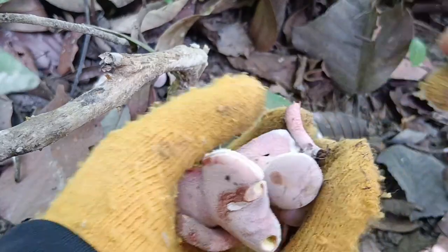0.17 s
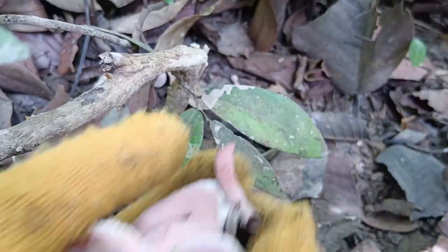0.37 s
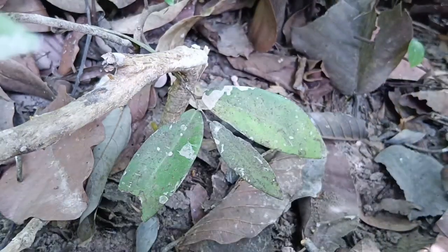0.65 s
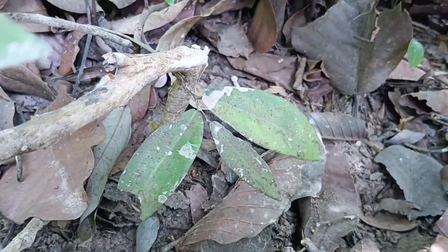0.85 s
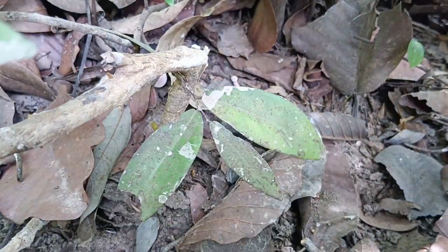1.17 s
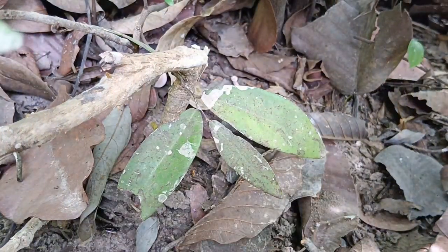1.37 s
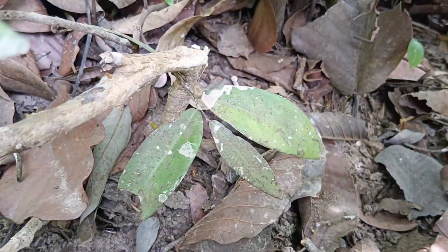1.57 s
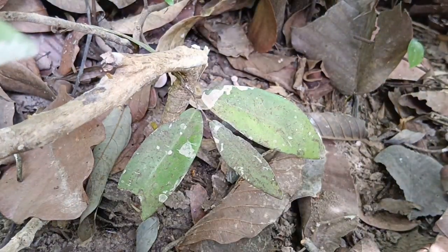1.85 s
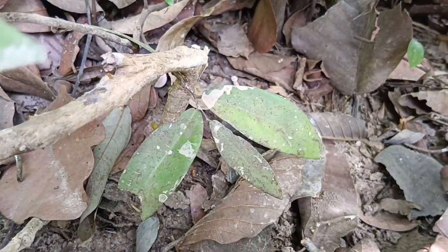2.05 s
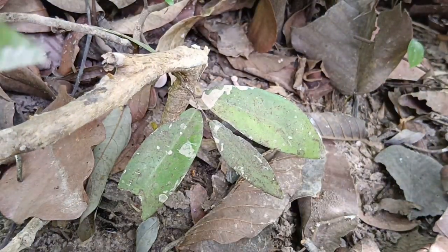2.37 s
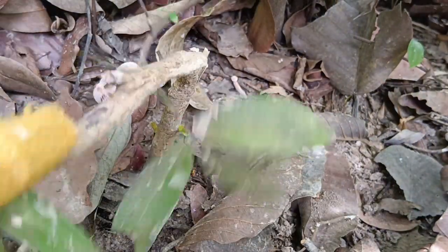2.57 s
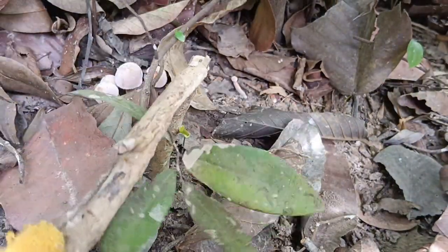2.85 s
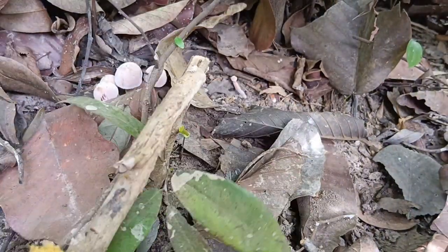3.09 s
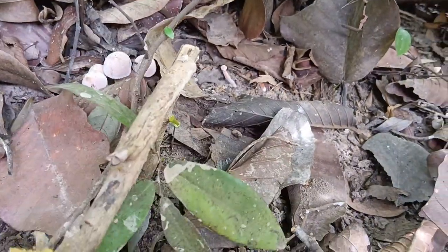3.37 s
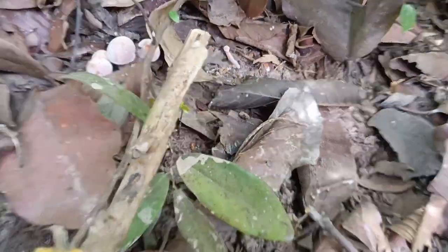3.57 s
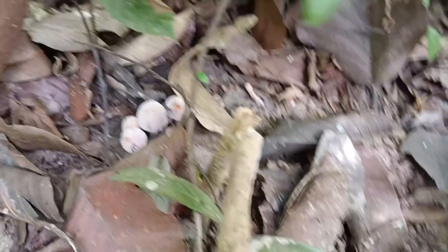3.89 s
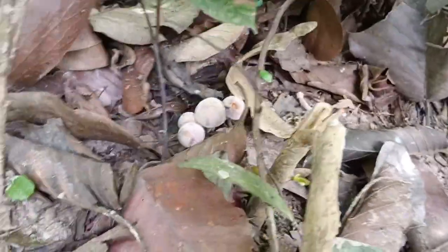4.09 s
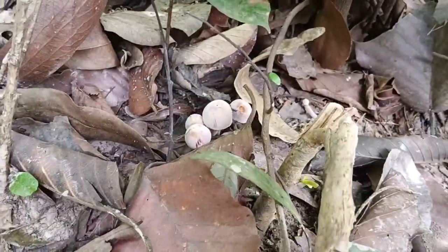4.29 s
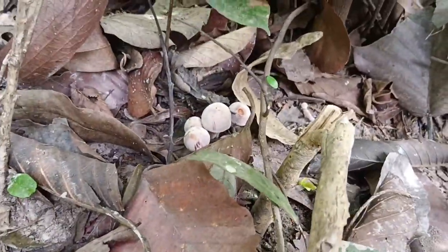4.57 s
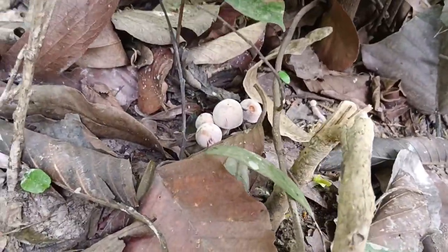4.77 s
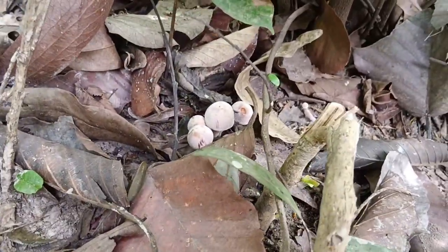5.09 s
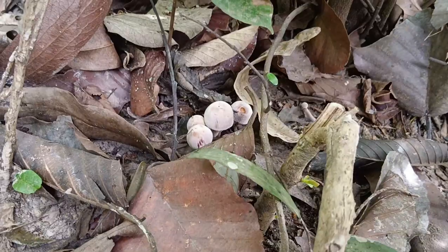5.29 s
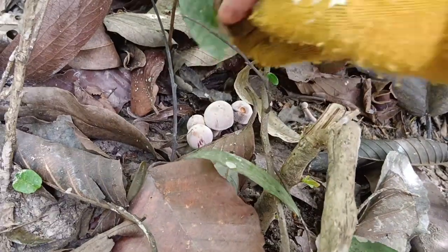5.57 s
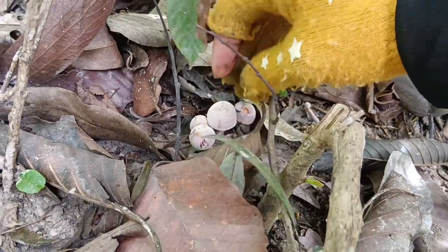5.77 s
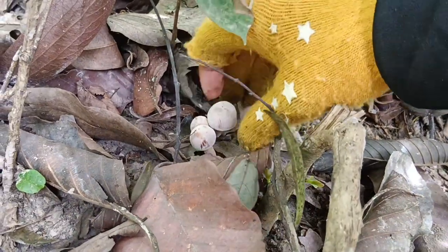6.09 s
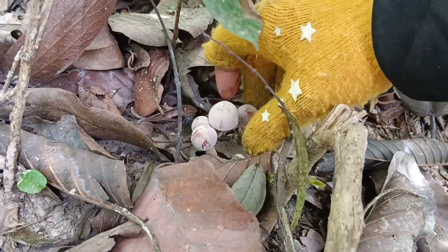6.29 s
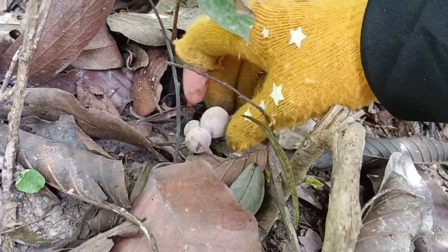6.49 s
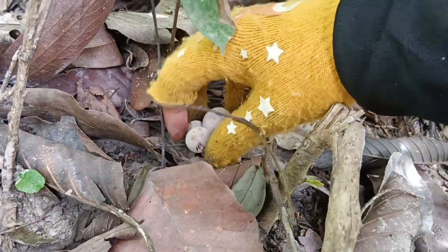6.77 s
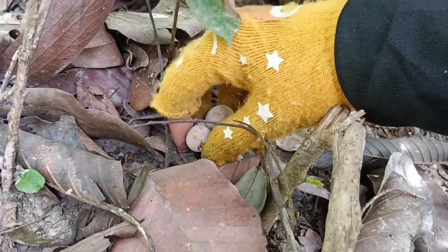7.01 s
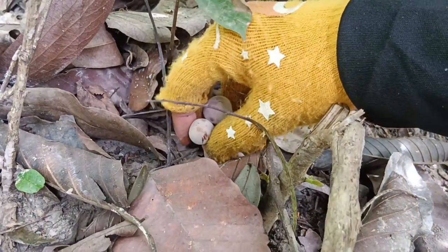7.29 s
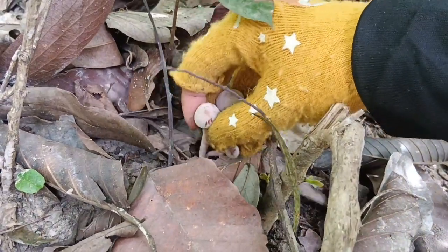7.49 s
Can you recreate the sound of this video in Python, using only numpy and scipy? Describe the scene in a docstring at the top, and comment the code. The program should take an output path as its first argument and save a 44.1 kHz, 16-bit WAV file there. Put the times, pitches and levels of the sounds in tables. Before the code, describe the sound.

Close stereo microphone on a forest floor. Faint crisp leaf rustles and a few light snaps come first, then near silence. A sudden loud crunch of leaves breaks in with a quick, dry wooden clatter as a branch is shoved aside. More crunching and a low bump on the microphone follow, then scattered twig snaps and soft rustling that fade to tiny ticks, over a faint steady hiss.

```python
"""A forest floor: gloved hands work through dry leaf litter, close to a hand-held stereo microphone.
Leaves rustle as thousands of tiny noise bursts, each coloured by a ringing blade; stiff blades and twigs
snap as larger bursts, and a dead branch is shoved aside with a woody clatter of decaying modes.
The hand holding the microphone bumps and rubs its housing: swelling low tones and rumbling noise.
Behind lies a faint, steady background of coloured noise with a hiss band in the treble."""
import sys
import numpy as np
from scipy import signal
from scipy.fft import rfft, irfft, next_fast_len
from scipy.io import wavfile
from scipy.ndimage import uniform_filter1d

SR = 44100
rng = np.random.default_rng(int(sys.argv[2]) if len(sys.argv) > 2 else 0)


def wrap_up_sound(samples):
    """Save the sound to the file named by the first command line argument, as 16-bit audio."""
    columns = np.atleast_2d(samples).T
    # keep every value between -1 and 1, then stretch to whole-number steps
    tamed = np.clip(columns, -1, 1)
    steps = np.round(tamed * 32767).astype(np.int16)
    wavfile.write(sys.argv[1], SR, steps)


N = 336924  # samples
TIME = np.arange(N) / SR
HZ = np.maximum(np.fft.rfftfreq(next_fast_len(N, True), 1 / SR), 1)
SNAP_SIZE = 2048  # samples in one fracture
SNAP_HZ = np.maximum(np.fft.rfftfreq(SNAP_SIZE, 1 / SR), 1)

# relative spectrum of breaking dry leaf: frequency_hz, density_db (per Hz)
LEAF_SPECTRUM = [(150, -39), (300, -19), (480, -15.5), (700, -10), (1100, -7.5), (1500, -2.5), (2600, 2),
                 (4300, -4.5), (5400, 0), (6500, -7.5), (8000, -10), (10500, -5), (12300, -7.5),
                 (15500, -13.5)]

# Everywhere below, a positive left_right_db means louder on the left.


def from_db(db):
    """Decibels to amplitude gain."""
    return 10 ** (np.asarray(db) / 20)


def rms_one(x):
    """Scale to rms 1."""
    return x / np.sqrt(np.mean(x ** 2) + 1e-20)


def in_time(rows):
    """Interpolate the columns of a curve, whose first column is time, at every sample."""
    s, *columns = np.transpose(rows)
    return [np.interp(TIME, s, column) for column in columns]


def at_hz(points, hz):
    """Read a spectrum on a log-frequency axis."""
    point_hz, db = np.transpose(points)
    return np.interp(np.log(hz), np.log(point_hz), db)


def panned(pan_db):
    """Left and right gains of constant power."""
    gains = from_db(np.array([[.5], [-.5]]) * pan_db)
    return gains / np.sqrt(np.mean(gains ** 2, axis=0))


def spectrum_of(x):
    """Spectrum of a whole track on the HZ grid."""
    return rfft(x, next_fast_len(N, True))


def track_of(spectrum):
    """Back from the HZ grid to a track."""
    return irfft(spectrum, next_fast_len(N, True))[..., :N]


def add(out, s, sound):
    """Mix a short stereo sound in at time s."""
    i = max(int(s * SR), 0)
    out[:, i:i + sound.shape[1]] += sound[:, :N - i]


def wander(per_s, count=4000):
    """A random course through per_s fresh values a second, joined by straight lines."""
    return np.interp(TIME * per_s, np.arange(count), rng.standard_normal(count))


def noise(points, alike_hz):
    """Coloured stereo noise of rms 1; the ports share half its power at alike_hz and more below."""
    shared = spectrum_of(rng.standard_normal(N))
    own = spectrum_of(rng.standard_normal((2, N)))
    alike = 1 / (1 + (HZ / alike_hz) ** 2)
    mixed = np.sqrt(alike) * shared + np.sqrt(1 - alike) * own
    return rms_one(track_of(mixed * from_db(at_hz(points, HZ))))


def gestures(rows, resting, attack_db_per_s, slope_db, release_db_per_s):
    """Attack, sloping hold and release per row over a resting state: level, then power-weighted columns."""
    t = TIME[::40]
    s, length_s, db, *columns = np.transpose(rows)[:, :, None]
    # a row's level is reached halfway through its hold
    hold_db = db + slope_db * (np.clip((t - s) / length_s, 0, 1) - .5)
    attack_db = attack_db_per_s * np.maximum(s - t, 0)
    release_db = release_db_per_s * np.maximum(t - s - length_s, 0)
    power = from_db(hold_db - attack_db - release_db) ** 2
    rest = from_db(resting[0]) ** 2
    total = power.sum(axis=0) + rest
    blends = [((power * column).sum(axis=0) + rest * value) / total
              for column, value in zip(columns, resting[1:])]
    return in_time(np.transpose([t, 10 * np.log10(total), *blends]))


def stirring():
    """Level, body, crispness and direction of the litter as the glove's strokes pass through it."""
    # strokes of the glove: start_s, length_s, level_db (relative), body_db, crispness_db, left_right_db
    strokes = [(0, 0.073, -59, -5, 15, 1), (.08, 0.078, -51, 3.5, 6.5, -2.5),
               (.19, 0.17, -49, 3.5, 7.5, -9), (.37, 0.096, -53.5, -7, 0, -9),
               (.46, 0.057, -49, 12.5, 1.5, -8), (.59, 0.18, -51, -6.5, -1.5, 1),
               (.84, 0.058, -53.5, -6, 2, -0.5), (.96, 0.099, -51, 0, 3.5, 0.5),
               (1.11, .055, -47.5, -11, 2, 3), (1.21, 0.048, -50.5, -1, 0.5, 1),
               (1.33, .18, -56, -4, 4, 1.5), (1.70, 0.024, -53.5, -3, -3, 9),
               (2.315, .06, -39, 11.5, 0, -9), (2.42, 0.065, -37, 13, -2, -4.5),
               (2.475, 0.043, -30.5, 8, -3, -4.5), (2.57, 0.26, -31.5, 9, -3.5, 0),
               (2.855, 0.033, -27, 7.5, -2.5, 2), (2.92, 0.075, -39, -2, -4.5, 1.5),
               (3.07, 0.084, -45, -4.5, -3.5, -7.5), (3.295, 0.058, -45.5, -20, -9, -0.5),
               (3.375, 0.12, -35, 2, -2.5, -1.5), (3.51, 0.086, -37, -11, 0, -1),
               (3.60, 0.17, -32, 1, -1, -0.5), (3.835, 0.11, -30.5, 2, -1.5, 0.5),
               (3.97, 0.031, -33, 1.5, -3, .5), (4.04, 0.049, -39.5, 5, -1.5, 2),
               (4.13, 0.083, -37.5, 6, -3.5, 0), (4.235, 0.013, -34.5, 9.5, -2, 0),
               (4.355, 0.016, -33.5, 6, -3.5, 0), (4.42, 0.0068, -42.5, 13.5, -5, -5),
               (4.545, 0.039, -41.5, -1, -3, 0.5), (4.69, 0.047, -41.5, 2, -2, -0.5),
               (4.88, .045, -52.5, -2, 2, -3), (4.945, 0.039, -41, -10, -3, 2.5),
               (5.035, 0.12, -43, 5.5, -0.5, 2), (5.18, 0.069, -48, 0, 0, 2), (5.305, .12, -40, 5, 3, 1),
               (5.45, 0.075, -42, 2, 3.5, 2), (5.60, 0.079, -39.5, 0.5, 1, 2),
               (5.71, 0.0079, -40, 8, -0.5, -3), (5.80, 0.092, -45, -14, -4.5, -3),
               (5.89, 0.17, -44, 4, 0.5, -1), (6.10, 0.023, -50.5, -21, -3.5, 3),
               (6.18, 0.035, -56.5, -14, 2, 0), (6.24, 0.041, -53.5, 2.5, 10, 1.5),
               (6.44, 0.027, -43, -4, -0.5, -6), (6.53, 0.087, -46.5, -10, 2.5, -5),
               (6.63, 0.053, -55, -11, 6, -9), (6.735, 0.025, -44.5, -2.5, 5.5, -7),
               (6.88, 0.12, -60.5, 2, 7, -4.5), (7.063, 0.011, -51, 2, 5, -5),
               (7.31, 0.035, -60.5, 4, 18.5, -6.5), (7.425, 0.059, -40.5, 5.5, 2, -3.5),
               (7.51, 0.072, -43, 6, -6, -5)]
    # leaves under a resting hand: level_db (relative), body_db, crispness_db, left_right_db
    resting_litter = (-70, 2, -0.5, 0.5)
    # a stroke bites in quickly, eases by 1 dB as it goes, and the leaves settle after it
    return gestures(strokes, resting_litter, attack_db_per_s=418.5, slope_db=-1, release_db_per_s=265)


def tone_db(hz, body_db, crisp_db, body_hz=(750, 1500), crisp_hz=(3200, 8000)):
    """Thick, pressed litter adds body; thin dry edges add crispness."""
    body = body_db * np.interp(np.log(hz), np.log(body_hz), [1, 0])
    crispness = crisp_db * np.interp(np.log(hz), np.log(crisp_hz), [0, 1])
    return body + crispness


def rustle(stir, count=26, patchy_db=3.0, shifts_per_s=30, gain_db=1.5, clump_db=2.0, clumps_per_s=170):
    """Crackle follows the stirring in clumps; its colour shifts as other leaves come under the glove."""
    # slow course of the level above about 10 kHz: time_s, treble_db
    top_treble = [(0, 4.5), (1.6, 3), (2.4, 4), (5.9, -1), (6.3, -5.5), (7.3, -9.5), (7.45, 1.5),
                  (7.64, -3)]
    level_db, body_db, crisp_db, pan_db = stir
    top_treble_db, = in_time(top_treble)
    grains = spectrum_of(crackle(level_db) + flicks())
    level_db = level_db + gain_db + clump_db * wander(clumps_per_s)
    centres = np.geomspace(300, 14000, count)
    out = 0
    for hz, pick in zip(centres, np.eye(count)):
        # overlapping triangular bands
        band = track_of(grains * np.interp(np.log(HZ), np.log(centres), pick))
        patches_db = patchy_db * min(hz / 1800, 1) * wander(shifts_per_s)
        top_share = np.interp(hz, [9500, 12000], [0, 1])
        colour_db = tone_db(hz, body_db, crisp_db) + patches_db + top_share * top_treble_db
        out = out + band * from_db(level_db + colour_db)
    return out * panned(pan_db)


def crackle(level_db, count=40):
    """Tiny fractures dealt to leaves of varied pitch and direction; harder stirring breaks more."""
    per_s = np.minimum(2000 * from_db(.35 * (level_db + 47)), 6000)
    born = np.flatnonzero(rng.random(N) < per_s / SR)
    size_db = 3.4 * np.minimum(rng.exponential(1, N), 4.2)
    sizes = (from_db(size_db) * rng.choice([-1, 1], N))[born]
    dealt = rng.integers(0, count, N)[born]
    colour_db = at_hz(LEAF_SPECTRUM, SNAP_HZ)
    out = np.zeros((2, N))
    for k, ring_hz in enumerate(np.geomspace(800, 13000, count)):
        lead_ms = rng.normal(0, .15)
        leaf = fracture(colour_db, ring_hz, lead_ms, decay_s=0.0015, ring_db=12.5, ring_q=8.9, scatter=0.25)
        leaf = rms_one(leaf[:, :SNAP_SIZE // 4])
        for i, size in zip(born[dealt == k], sizes[dealt == k]):
            add(out, i / SR, size * leaf)
    # even out the running level, which the stirring sets afterwards
    power = uniform_filter1d(np.mean(out ** 2, axis=0), size=900)
    return out / np.sqrt(np.maximum(power, 0) + 0.11 * power.mean())


def flicks(per_s=100, size_db=-1.5, spread_db=3.5, cycles=13, count=2000):
    """Stiff blades spring free of one another and ring briefly, each at a pitch of its own."""
    out, t = np.zeros((2, N)), TIME[:SNAP_SIZE]
    draws = zip(rng.random((count, 3)), rng.standard_normal((count, 2)))
    for (wait, pitch, turn), (size, side) in draws:
        s = wait * count / per_s
        if s < TIME[-1]:
            hz = 1900 * (12000 / 1900) ** pitch
            envelope = (1 - np.exp(-t / 0.0012)) * np.exp(-t * hz / cycles)
            port_t = t + side * np.array([[.0001], [0]])  # the left port leads or lags
            wave = envelope * np.sin(2 * np.pi * (hz * port_t + turn))
            level_db = size_db + .6 * at_hz(LEAF_SPECTRUM, hz) + spread_db * min(size, 2)
            add(out, s, wave * from_db(level_db) * panned(3 * side))
    return out


def causal(db):
    """Minimum-phase response with these magnitudes: nothing sounds before the blow."""
    cepstrum = irfft(np.log(from_db(db)))
    cepstrum[1:SNAP_SIZE // 2] *= 2
    cepstrum[SNAP_SIZE // 2 + 1:] = 0
    return np.exp(rfft(cepstrum))


def fracture(colour_db, ring_hz, lead_ms, decay_s, ring_db, ring_q, scatter):
    """A burst dies in a blade that rings at three pitches; each port adds its own scatter off the litter."""
    t = np.arange(SNAP_SIZE) / SR
    direct = rng.standard_normal(SNAP_SIZE) * np.exp(-t / decay_s)
    scattered = scatter * rng.standard_normal((2, SNAP_SIZE)) * np.exp(-t / (4.25 * decay_s))
    # a positive lead reaches the left port first
    lag_s = np.maximum(np.array([[-lead_ms], [lead_ms]]), 0) / 1000
    burst = rfft(direct) * np.exp(-2j * np.pi * SNAP_HZ * lag_s) + rfft(scattered)
    modes = [(ring_hz, 1), (0.551 * ring_hz, .7), (1.376 * ring_hz, .6)]
    ring = sum(share * ring_db / (1 + (ring_q * (SNAP_HZ / hz - hz / SNAP_HZ)) ** 2) for hz, share in modes)
    return irfft(burst * causal(colour_db + ring))


def snaps(stir, gain_db=-.5, strain_db=-20, strain_s=0.0052, body_share=1.0, ring_db_per_octave=5):
    """Stiff leaves and twigs break after a faint early crack, with the body of the litter around them."""
    # main breaks: start_s, level_db (onset rms before gain_db), ring_hz, crispness_db, left_right_db
    main_breaks = [(.226, -41, 1010, 0, -20.5), (.4756, -40.5, 2170, -5, -2), (.638, -39, 2170, -14, -2),
                   (1.1113, -27.5, 2710, 9, 7), (1.1542, -30, 4850, 5.5, 3.5), (1.2243, -38, 3740, 23, 5.5),
                   (1.3324, -39.5, 4100, 23, 7), (1.338, -43, 1150, -6, 3), (1.5633, -24.5, 1840, 7.5, 7.5),
                   (2.0755, -38.5, 5100, 2, 26), (2.0895, -43.5, 5060, 4, 21),
                   (2.3114, -31.5, 1120, -17, -4.5), (2.566, -21, 2040, -12, -4.5),
                   (2.6684, -23, 2500, 6, -5), (2.8595, -19.5, 1770, -16, 10), (2.884, -18, 2600, -18, 6),
                   (2.9858, -26.5, 2550, 4, 2), (3.0286, -28.5, 3750, 6, -7), (3.0934, -31, 1900, -7, -3.5),
                   (3.483, -27.5, 5700, 1, -1), (3.8395, -19, 3460, 0.5, 0),
                   (3.9294, -20, 2090, -3.5, -2.5), (4.2207, -27, 2500, -10, -2),
                   (4.2444, -29.5, 2730, 1, 6), (4.293, -34, 3100, 8, 9), (4.3288, -36, 2500, 10, -0.5),
                   (4.3459, -28, 3020, 0, 14), (4.4182, -32, 2020, -16, 2), (4.5211, -35, 3050, 10, -10),
                   (4.6993, -30.5, 2940, 4, 17), (4.7555, -36.5, 950, -13, -2.5),
                   (4.8182, -25.5, 2560, 1, -11.5), (4.9445, -28.5, 2470, 6, -0.5),
                   (5.0186, -27, 3500, -4, -0.5), (5.1254, -29, 2010, 1.5, -4), (5.3142, -32, 2330, 0, 12),
                   (5.3876, -29, 2610, 10, -15), (5.7019, -30.5, 2270, 10, 5.5),
                   (5.708, -24, 2230, -3, -4.5), (5.8493, -37, 3170, 31, -6.5),
                   (5.8984, -29, 2660, -18, 12.5), (5.9668, -37, 1970, -5, -1),
                   (6.044, -21.5, 2450, -3.5, 9), (6.2456, -40.5, 2220, -16, 24),
                   (6.3755, -42, 2390, 34, -7), (6.5203, -31.5, 3210, 9, 7), (6.7142, -35.5, 5640, 7, -6),
                   (6.925, -48.5, 2340, 13, 1), (7.2447, -45.5, 6700, 20, -7.5),
                   (7.3881, -34.5, 2730, 2.5, -1)]
    stir_db, litter_body_db = stir[:2]
    out = np.zeros((2, N))
    for s, level_db, ring_hz, crisp_db, pan_db in list(main_breaks) + small_snaps(stir_db):
        body_db = -8 + body_share * litter_body_db[int(s * SR)]
        colour_db = at_hz(LEAF_SPECTRUM, SNAP_HZ) + tone_db(SNAP_HZ, body_db, crisp_db)
        # a break well to one side reaches the nearer port up to 0.341 ms sooner
        lead_ms = 0.341 * np.tanh(pan_db / 9)
        # small, high-pitched twigs ring out more strongly
        ring_db = 11 + ring_db_per_octave * max(np.log2(ring_hz / 2600), 0)
        for early_s, part_db in [(0, 0), (strain_s, strain_db)]:
            snap = fracture(colour_db, ring_hz, lead_ms, 0.0027, ring_db, ring_q=9, scatter=.22)
            onset_rms = np.sqrt(np.mean(snap[:, :SR // 200] ** 2))  # first 5 ms
            gain = from_db(level_db + gain_db + part_db) * panned(pan_db)
            add(out, s - early_s, snap / onset_rms * gain)
    return out


def small_snaps(stir_db, per_s=9, above_stir_db=4, spread_db=2.5, crisp_db=-4.5, crisp_spread_db=7,
                pan_spread_db=6, count=200):
    """Rows like the main breaks for lesser ones: random in time, their level following the stirring."""
    wait, pitch = rng.random((count, 2)).T
    size, crisp, side = rng.standard_normal((count, 3)).T
    s = wait * count / per_s
    ring_hz = 1700 * (4500 / 1700) ** pitch
    level_db = np.interp(s, TIME, stir_db) + above_stir_db + spread_db * size
    columns = [s, level_db, ring_hz, crisp_db + crisp_spread_db * crisp, pan_spread_db * side]
    return list(np.transpose(columns)[s < TIME[-1]])


def branch(pan_db=5.0, lead_s=0.00023, vary_db=4.0):
    """Knocks strike the modes of dead wood, each a little differently; the left port hears them first."""
    # knocks as the branch is shoved aside: start_s, peak_db (before panning)
    knocks = [(2.6325, -18), (2.6895, -12), (2.7063, -13), (2.7097, -12), (2.7235, -12), (2.7265, -12),
              (2.7309, -7), (2.7338, -13), (2.7372, -9), (2.7495, -19), (2.9025, -20)]
    # modes of the wood: pitch_hz, level_db (before variation and filter), t60_s
    wood_modes = [(660, -9.5, 0.028), (1000, -7.5, .03), (1424, -2.5, 0.06), (1770, 3, 0.017),
                  (2170, 7.5, 0.0095), (2780, 7.5, 0.0095), (3180, -3, 0.013), (5030, -14, .006)]
    out = np.zeros((2, N))
    t = np.maximum(TIME[:SR // 8] - np.array([[0], [lead_s]]), 0)
    # a thin stick gives no bass, soft bark no treble
    radiated = signal.butter(3, [650, 3600], "band", fs=SR, output="sos")
    for s, peak_db in knocks:
        knock = 0
        for k, (hz, db, t60_s) in enumerate(wood_modes):
            mode_db = db + vary_db * rng.standard_normal() - 60 * t / t60_s
            knock = knock + (-1) ** k * from_db(mode_db) * np.sin(2 * np.pi * hz * t)
        knock = signal.sosfilt(radiated, knock)
        add(out, s, knock / np.abs(knock).max() * from_db(peak_db) * panned(pan_db))
    return out


def scrapes(half_width_hz=55):
    """Rubbing excites one narrow, gliding, hollow resonance that swells and fades."""
    # hollow scrapes: start_s, length_s, level_db (rms), first_hz, last_hz, left_right_db
    glides = [(.21, 0.073, -55.5, 797, 823, -9), (0.265, 0.22, -64, 910, 863, -15),
              (0.466, 0.068, -63, 777, 597, -22), (0.673, 0.11, -69.5, 512, 534, -12),
              (0.808, 0.24, -64, 508, 610, 12), (1.082, 0.096, -66, 556, 512, 13),
              (1.354, 0.12, -62.5, 565, 508, 6), (3.299, 0.12, -58.5, 544, 752, 10),
              (4.638, 0.034, -56, 1036, 1020, -11), (5.012, 0.028, -49, 1026, 1000, 5),
              (7.41, 0.12, -55.5, 475, 564, -5), (7.555, 0.038, -48.5, 861, 884, 0)]
    out = np.zeros((2, N))
    lowpass = signal.butter(2, half_width_hz, fs=SR, output="sos")
    for s, length_s, level_db, first_hz, last_hz, pan_db in glides:
        n = int(length_s * SR)
        friction = signal.sosfilt(lowpass, rng.standard_normal((2, SR)))[:, -n:]
        turn = 2 * np.pi * np.cumsum(np.linspace(first_hz, last_hz, n)) / SR
        tone = friction[0] * np.cos(turn) + friction[1] * np.sin(turn)
        tone = tone * np.sin(np.linspace(0, np.pi, n))
        add(out, s, rms_one(tone) * from_db(level_db) * panned(pan_db))
    return out


def undergrowth(x, t60_s=0.082):
    """Stems and trunks scatter back a short tail: decaying noise of unit energy in each port."""
    t = TIME[:SR // 4]
    tail = rng.standard_normal((2, len(t))) * from_db(-60 * t / t60_s) * (1 - np.exp(-t / 0.0016))
    tail /= np.sqrt(np.sum(tail ** 2, axis=1, keepdims=True))
    return signal.oaconvolve(x, tail, axes=1)[:, :N]


def lingering(x, ring_hz=5400, half_width_hz=350, ring_db=-17, ring_t60_s=0.31):
    """A faint, narrow treble ring of decaying noise hangs on after each sharp break."""
    t = TIME[:SR // 3]
    edges_hz = [ring_hz - half_width_hz, ring_hz + half_width_hz]
    band = signal.butter(2, edges_hz, "band", fs=SR, output="sos")
    tail = rng.standard_normal((2, len(t))) * from_db(-60 * t / ring_t60_s)
    tail = signal.sosfilt(band, tail / np.sqrt(np.sum(tail ** 2, axis=1, keepdims=True)))
    return from_db(ring_db) * signal.oaconvolve(x, tail, axes=1)[:, :N]


def handling():
    """The hand on the microphone: a rumbling, sliding grip and soft bumps on the housing."""
    return grip() + bumps()


def grip(rub_db=-4.5):
    """Fingers slide on the housing as low noise, over the fainter rumble of the resting grip."""
    # slides: start_s, length_s, level_db (before rub_db), left_right_db
    slides = [(.11, 0.056, -50.5, 16), (1.355, 0.012, -53, 5), (2.03, .04, -57, 10),
              (2.28, 0.051, -51, -28), (3.22, 0.1, -59.5, 4), (3.40, 0.026, -41.5, 7),
              (3.48, 0.034, -34.5, 8), (3.67, .02, -57, -16), (3.92, 0.046, -48, 24), (4.16, 0.13, -56, 18),
              (4.33, 0.11, -59, 8), (4.63, 0.024, -53, 22), (5.34, 0.042, -60, 8)]
    # resting grip: level_db (before rub_db), left_right_db
    resting_grip = (-73.5, 0.72)
    # relative spectrum of the rubbing: frequency_hz, density_db (per Hz)
    rub_spectrum = [(20, -29), (45, -4.5), (85, 8.5), (150, 7), (250, -3), (450, -40), (1200, -64.5)]
    # a slide slips quickly, eases by half a decibel on its way, and sticks more slowly
    level_db, pan_db = gestures(slides, resting_grip, attack_db_per_s=500, slope_db=-.5, release_db_per_s=253)
    return noise(rub_spectrum, alike_hz=59.7) * from_db(level_db + rub_db) * panned(pan_db)


def bumps(overtone_db=-13, overtone_ratio=2.21, scuff_db=-17, scuff_hz=750):
    """Soft bumps swell and die in the housing's low resonances, with a scuff of skin."""
    # dull bumps: start_s, level_db (at the top of the swell), pitch_hz, swell_s, left_right_db
    hits = [(0.229, -51, 314, 0.0029, -13), (1.336, -35, 460, 0.003, 7), (1.35, -41, 343, 0.005, 4),
            (2.355, -53, 143, 0.012, -24), (3.395, -27, 204, 0.0032, 13), (3.475, -32.5, 125, 0.0029, 19),
            (3.484, -43.5, 583, 0.0038, 20), (3.61, -48, 436, 0.0069, 12), (3.668, -37.5, 258, 0.0023, -20),
            (4.237, -46, 93, 0.012, 17), (4.629, -43.5, 205, 0.014, 22.5), (5.114, -54.5, 205, 0.0055, 20)]
    # after each bump the hand settles once more: later, softer, lower and slower
    rebounds = [(s + 0.019, db - 17, hz * 0.72, swell_s * 1.7, pan_db) for s, db, hz, swell_s, pan_db in hits]
    out = np.zeros((2, N))
    t = TIME[:SR // 5]
    skin = signal.butter(2, [200, scuff_hz], "band", fs=SR, output="sos")
    for s, level_db, hz, swell_s, pan_db in list(hits) + rebounds:
        swell = (t / swell_s * np.exp(1 - t / swell_s)) ** 2
        turn = 2 * np.pi * hz * t
        overtone = from_db(overtone_db) * np.exp(-t / 0.0037) * np.sin(overtone_ratio * turn)
        scuff = rms_one(signal.sosfilt(skin, rng.standard_normal(len(t))))
        # quicker bumps scuff harder
        scuff = from_db(scuff_db) * scuff * 0.0069 / swell_s
        bump = swell * (np.sin(turn) + overtone + scuff)
        add(out, s, bump * from_db(level_db + np.array([[.5], [-.5]]) * pan_db))
    return out


def background(level_db=-63.5):
    """Steady, faint coloured noise behind everything, alike in both ports only in the bass."""
    # relative spectrum of the steady background noise, with a hiss band near 8.5 kHz:
    # frequency_hz, density_db (per Hz)
    background_spectrum = [(20, -10), (60, -15), (130, -0.5), (220, -11), (420, -10), (650, -15),
                           (1100, -22.5), (2600, -15.5), (4400, -18.5), (5500, -8.5), (7000, -24),
                           (8500, -3.5), (10000, -16.5), (15500, -48)]
    return from_db(level_db) * noise(background_spectrum, alike_hz=447)


def scene():
    """Litter and breaks with their tails, handling, and the steady background noise."""
    stir = stirring()
    leaves = rustle(stir) + scrapes()
    breaks = snaps(stir) + branch()
    scattered = undergrowth(from_db(-6) * leaves + from_db(-16) * breaks)
    return leaves + breaks + scattered + lingering(breaks) + handling() + background()


def record(dry):
    """The top is cut steeply above 15.6 kHz."""
    return signal.sosfilt(signal.ellip(10, .2, 70, 15600, fs=SR, output="sos"), dry)


dry = scene()
out = record(dry)
wrap_up_sound(out)
```